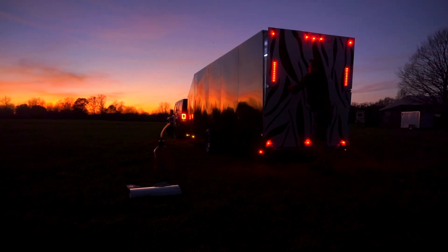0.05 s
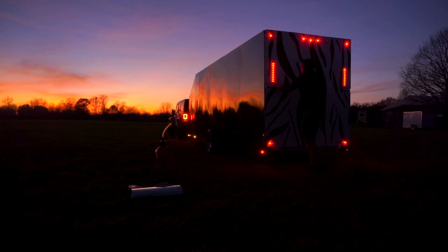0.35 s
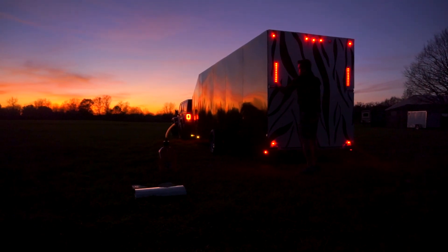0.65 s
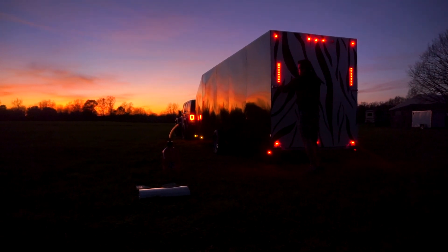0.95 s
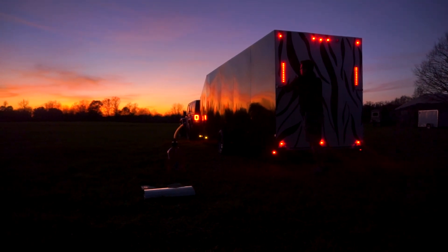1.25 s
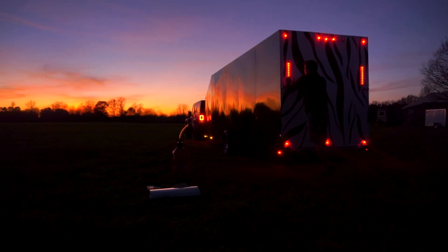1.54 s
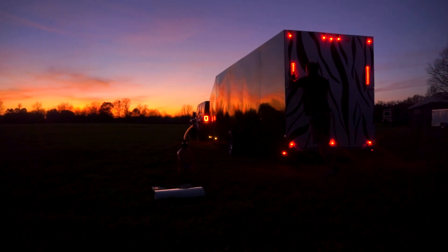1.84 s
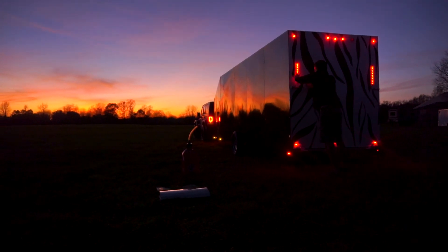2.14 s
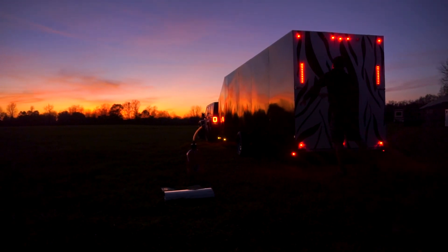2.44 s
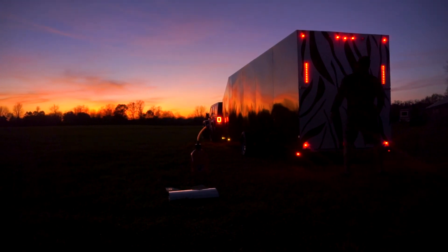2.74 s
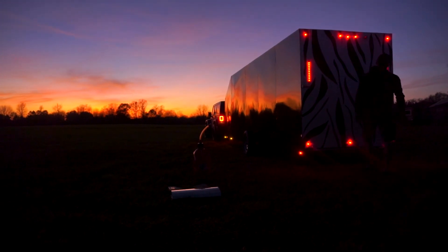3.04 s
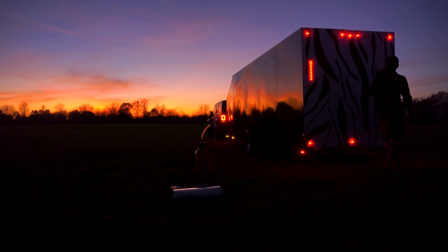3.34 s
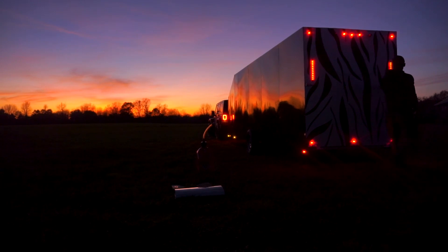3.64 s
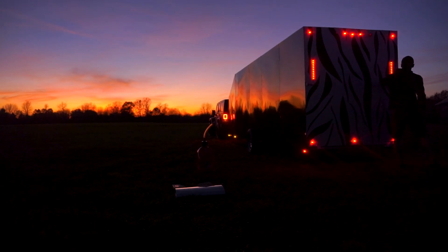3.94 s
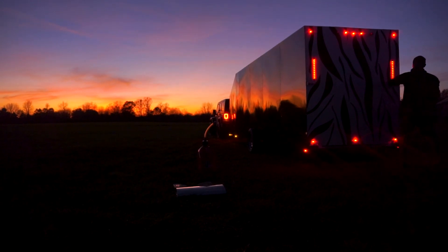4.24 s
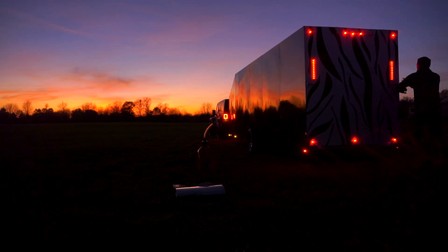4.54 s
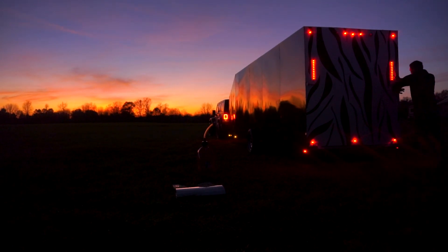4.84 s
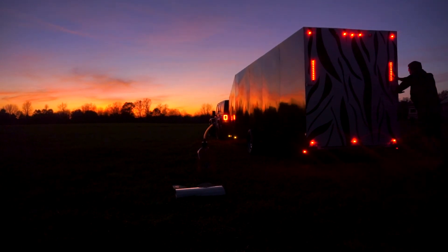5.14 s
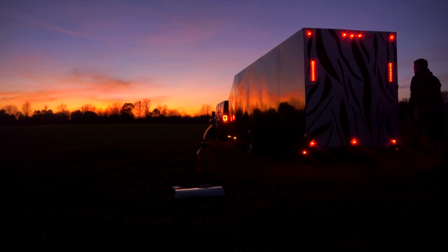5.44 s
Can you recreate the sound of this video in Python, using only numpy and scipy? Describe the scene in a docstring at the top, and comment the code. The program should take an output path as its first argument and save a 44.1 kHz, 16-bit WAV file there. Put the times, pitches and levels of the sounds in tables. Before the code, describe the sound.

Steel latch bars clack and an enclosed trailer's door bangs shut twice, booming and rattling briefly in a quiet open field.

```python
"""A steel latch bar scrapes and clacks, then the rear door of an enclosed trailer slams home: left edge
first, then right. Each slam booms in the box, clashes in the sheet metal and shakes loose hardware;
pins snap in and a hasp bounces to rest. Behind it, an open field at dusk: rustling clothes and grass,
a distant road, a soft low rumble of air and a faint hiss."""
import sys
import numpy as np
from scipy import signal
from scipy.fft import rfft, irfft, next_fast_len
from scipy.io import wavfile
from scipy.ndimage import map_coordinates

SR = 44100
rng = np.random.default_rng(int(sys.argv[2]) if len(sys.argv) > 2 else 0)


def store_pcm(level_fs):
    """Save levels as 16-bit WAV."""
    pcm = np.round(np.clip(level_fs, -1, 1) * 32767).astype(np.int16)
    wavfile.write(sys.argv[1], SR, np.atleast_2d(pcm).T)


N = 246280
SCENE_S = np.arange(N) / SR
RING_S = np.arange(3 * SR // 2) / SR  # time since a blow

# (time [s], edge [0 left, 1 right], boom [dB], sheet metal [dB], rattle [dB], hold [s])
SLAMS = [(1.986, 0, -25, -22.5, -32.5, 0.15), (4.979, 1, -27, -23.5, -31.5, 0.21)]
# (frequency [Hz], left-edge gain [dB], right-edge gain [dB], t60 [s])
BOX_MODES = [(75, -19, -17, 1.2), (120.3, -14.5, -21, 1.1), (161, -9.5, -12.5, 1.14), (190, -4, 1.5, 0.45),
             (214.4, 6, -13, 0.48), (244.8, -2.5, -0.5, 0.65), (264.8, -3.5, -2.5, 0.62),
             (299, -9, -12, 0.84), (460, -22, -5, 0.29), (653, -22.5, -22, 1.1), (742, -16, -10.5, 0.55),
             (821, -18, -19, 0.24), (1110, -10, -9, 0.2), (1970, -16, -13, 0.64), (2040, -10.5, -27, 0.47),
             (2180, -21, -34, 0.23), (2600, -22, -28, 0.31), (2770, -36, -16, 0.43)]
SHEET_SPECTRUM = [(21, -64), (35, -30), (93, -25.5), (151, -10.5), (210, -6), (301, -11), (478, -14.5),
                  (739, -13.5), (1720, -21.5), (2010, -18), (5590, -30), (6040, -34), (10900, -26),
                  (14800, -35), (16000, -55)]  # (frequency [Hz], relative density [dB])
SHEET_DECAY = [(100, 1.0), (250, 0.83), (700, 0.57), (2000, 0.62), (5000, 0.56), (12000, 0.39)]  # (frequency [Hz], t60 [s])
def slams(rattle_t60_s=0.49, rattle_rest_s=0.4):
    """The door hits its frame, shoves the air once and rings out."""
    out = np.zeros((2, N))
    for s, edge, boom_db, sheet_db, rattle_db, hold_s in SLAMS:
        age_s = np.hypot(RING_S, hold_s) - hold_s  # the slam stays level briefly before it dies away
        box = [(hz, right if edge else left, t60) for hz, left, right, t60 in BOX_MODES]
        boom = amp(boom_db) * modes(box, age_s, rise_cycles=12.2)
        sheet = amp(sheet_db) * plate(SHEET_SPECTRUM, SHEET_DECAY, age_s)
        settle = 1 / (1 + (RING_S / rattle_rest_s) ** 16)
        loose = amp(rattle_db - 60 * age_s / rattle_t60_s) * settle * rattle()
        thump = amp(boom_db - 13) * bell(RING_S - 0.014, 0.013) * np.sin(2 * np.pi * 80 * RING_S)
        add(out, s, boom + sheet + loose + thump)
    return out


# (time [s], touch lead [s], clack [dB], bar [dB], leaf [dB], shudder [s], drop re blow [dB])
LATCHES = [(1.349, 0.056, -17, -12.5, -32, 0.0084, -28.5), (1.987, .0445, -23, -27, -44, .01, -11),
           (4.092, .027, -20, -15.5, -24, 0.034, -7.5)]
def latches(rebound_s=0.011, rebound_db=-5.5, drop_s=0.18):
    """The bar touches its keeper, clacks home, rebounds and drops back; the door rings behind it."""
    out = np.zeros((2, N))
    for s, lead_s, clack_db, bar_db, leaf_db, shudder_s, drop_db in LATCHES:
        touch = clank(clack_db - 17.5, bar_db - 24, t60_s=0.15) + door_leaf(db=-35, shudder_s=0)
        add(out, s - lead_s, touch)
        add(out, s, door_leaf(leaf_db, shudder_s))
        for delay_s, db in [(0, 0), (rebound_s, rebound_db), (drop_s, drop_db)]:
            add(out, s + delay_s, clank(clack_db + db, bar_db + db, t60_s=0.065))
    return out


CLACK_SPECTRUM = [(59, -54), (100, -9.5), (736, 5.5), (991, 4.5), (1420, -4.5), (1910, 6), (2420, -10),
                  (3860, -10), (5190, -9), (5770, -15.5), (7290, -16), (7770, -23.5), (10200, -13),
                  (14700, -30), (16000, -24)]  # (frequency [Hz], relative density [dB])
BAR_MODES = [(982, -22.5, 0.48), (1134, -18.5, 0.19), (1548, -27, 0.27), (1858, -8, 0.025),
             (2022, -32, 0.19), (2124, -26, 0.44), (2196, -28, 0.37)]  # (frequency [Hz], gain [dB], t60 [s])
def clank(clack_db, bar_db, t60_s):
    """Steel on steel: a dry clack and the ring of the bar."""
    clack = amp(clack_db - 60 * RING_S / t60_s) * noise(CLACK_SPECTRUM, len(RING_S))
    return clack + amp(bar_db) * modes(BAR_MODES, RING_S, rise_cycles=0.36)


LEAF_SPECTRUM = [(35, -53), (60, -27.5), (217, -6.5), (308, -7), (346, -9.5), (398, -9), (540, -4),
                 (579, -4), (946, -6), (1310, -13), (7750, -31), (10800, -20.5), (16000, -33)]  # (frequency [Hz], relative density [dB])
LEAF_DECAY = [(150, 1), (700, 0.7), (2000, 0.9), (10000, 0.32)]  # (frequency [Hz], t60 [s])
LEAF_MODES = [(341.6, -6.5, 0.61), (522, -12.5, 0.43), (660, -10, 0.72), (814, -37, 0.42), (996, -25, 0.24),
              (1200, -20, 0.6)]  # (frequency [Hz], gain [dB], t60 [s])
def door_leaf(db, shudder_s, spread_s=0.026):
    """A blow spreads over the door leaf, which shudders and rings out."""
    age_s = np.hypot(RING_S, shudder_s) - shudder_s
    ring = plate(LEAF_SPECTRUM, LEAF_DECAY, age_s) + modes(LEAF_MODES, age_s, rise_cycles=3.2)
    return amp(db) * ring * (1 - np.exp(-RING_S / spread_s))


HARDWARE_SPECTRUM = [(800, -11), (2000, 1.5), (3000, 0), (4500, -5), (6200, -3), (8500, -1.5), (11000, -1),
                     (13000, -2), (15500, -7.5)]  # (frequency [Hz], relative density [dB])
def rattle(hits_per_s=280, spread_db=10, t60_s=0.031):
    """Dense random contacts of loose hardware, rms 1."""
    size = len(RING_S)
    hits = (rng.random(size) < hits_per_s / SR) * amp(spread_db * rng.random(size))
    power = np.abs(signal.fftconvolve(hits ** 2, amp(-60 * RING_S / t60_s) ** 2)[:size])
    return unit(noise(HARDWARE_SPECTRUM, size, ripple_db=4.5) * np.sqrt(power))


def tick(db, pitch_hz, t60_s=0.03, focus_db=10.5, half_width_hz=1200):
    """A small steel part rings briefly around its pitch."""
    t = np.arange(SR // 10) / SR
    steel = noise(HARDWARE_SPECTRUM, len(t), ripple_db=4)
    burst = filtered(steel, lambda hz: amp(focus_db / (1 + ((hz - pitch_hz) / half_width_hz) ** 2)))
    return amp(db - 60 * t / t60_s) * unit(burst)


PINS = [(1.2957, -29, 5600), (1.9435, -14, 5100), (1.986, -9.5, 5240), (2.015, -3.5, 5460),
        (4.095, -6.5, 10200), (4.388, -27, 3820), (4.979, -11, 11400)]  # (time [s], level re gain_db [dB], pitch [Hz])
def pins(gain_db):
    """Each pin snaps into place with one tick."""
    out = np.zeros((2, N))
    for s, db, pitch_hz in PINS:
        add(out, s, tick(db + gain_db, pitch_hz))
    return out


# (time [s], level re gain_db [dB], first flight [s], next flight over last [ratio], rest after [s])
HASPS = [(2.0859, -10, .073, .68, .19), (4.9991, -5, .1364, .8, .28)]
def hasps(gain_db, high_hz=10840, low_hz=3500, fade_db_per_s=50):
    """A hasp with two resonances bounces after each slam in ever shorter, weaker hops."""
    out = np.zeros((2, N))
    for s, db, flight_s, shrink, rest_s in HASPS:
        hops_s = np.cumsum([0] + [flight_s * shrink ** k for k in range(6)])
        for hop_s in hops_s[hops_s < rest_s]:
            hop_db = db + gain_db - fade_db_per_s * hop_s
            add(out, s + hop_s, tick(hop_db, high_hz) + tick(hop_db - 4.5, low_hz))
    return out


SCRAPES = [(0.2, -55.5, 0.03), (1.037, -56.5, 0.13), (1.14, -51.5, 0.045), (1.24, -52, 0.04),
           (1.346, -39.5, 0.034), (1.957, -46.5, 0.027), (1.983, -26.5, 0.014), (2.76, -59, 0.14),
           (4.082, -28.5, 0.01)]  # (time [s], level [dB], half length [s])
GRIT_SPECTRUM = [(1000, -2), (3000, 3), (5500, -1.5), (8000, -3), (16000, -24)]  # (frequency [Hz], relative density [dB])
def scrapes():
    """Steel sticks and slips: the bar in its guides, the door on its frame."""
    strokes = sum(amp(db) * bell(SCENE_S - s, half_s) for s, db, half_s in SCRAPES)
    friction = noise(LEAF_SPECTRUM, N) + amp(-2.5) * noise(GRIT_SPECTRUM, N)
    return strokes * unit(friction * amp(2.7 * wobble(180)))


GROANS = [(0.319, 0.023, 230, 0, -56.5), (0.377, 0.099, 358, 353, -67), (4.965, 0.02, 362, 700, -46)]  # (time [s], half length [s], pitch [Hz], glide [Hz/s], level [dB])
def groans():
    """The strained door sings brief low notes, steady or rising."""
    out = np.zeros(N)
    for s, half_s, hz, glide_hz_per_s, db in GROANS:
        t = SCENE_S - s
        out += amp(db) * bell(t, half_s) * np.sin(2 * np.pi * (hz + glide_hz_per_s * t / 2) * t)
    return out


SWISHES = [(.2, -56, 0.042), (.41, -56.5, 0.093), (.61, -53.5, 0.04), (1.08, -52.5, 0.077),
           (1.13, -43.5, 0.036), (2.76, -50, 0.056), (2.97, -56, 0.065), (3.42, -51, 0.13),
           (3.71, -55, 0.035), (4.4, -51.5, 0.32), (4.72, -45, 0.12), (5.48, -55, 0.099)]  # (time [s], level [dB], half length [s])
RUSTLE_SPECTRUM = [(1000, -21), (2500, -16), (6000, -15.5), (8500, -7), (10500, 1.5), (12500, 4),
                   (16000, -2)]  # (frequency [Hz], relative density [dB])
CLICKS = [(1.562, -36), (2.538, -36), (4.7145, -19)]  # (time [s], level re click_db [dB])
CLICK_SPECTRUM = [(3000, -36), (7000, -23), (9500, 1), (12000, 9), (16000, -4)]  # (frequency [Hz], relative density [dB])
def rustle(right_db=2.0, click_db=-5.5):
    """Clothes and grass, off to the right: a grainy high hiss with a few dry clicks."""
    grain = amp(0.82 * wobble(30) + 2.25 * wobble(820))
    out = swells(SWISHES, floor_db=-67) * grain * noise(RUSTLE_SPECTRUM, N)
    t = np.arange(SR // 20) / SR
    click_decay = amp(-60 * t / 0.0029) + amp(-13 - 60 * t / 0.038)
    for s, db in CLICKS:
        add(out, s, amp(db + click_db) * click_decay * noise(CLICK_SPECTRUM, len(t)))
    return stereo(out, FAR_COHERENCE) * amp([[-right_db / 2], [right_db / 2]])


ROAD_LEVEL = [(0, -59.5), (1.8, -57), (4.8, -51.5), (5.58, -54.5)]  # (time [s], level [dB])
ROAD_SPECTRUM = [(60, -35), (200, -6), (350, -21.5), (540, -10.5), (780, 1.5), (1150, 2.5), (1600, -0.5),
                 (2100, -7), (3200, -15), (5500, -34), (16000, -50)]  # (frequency [Hz], relative density [dB])
def road():
    """Far traffic draws nearer, then recedes."""
    level_db = np.interp(SCENE_S, *np.transpose(ROAD_LEVEL))
    return stereo(amp(level_db) * noise(ROAD_SPECTRUM, N), FAR_COHERENCE)


AIR_SWELLS = [(.42, -70, .16), (1.14, -45.5, 0.15), (2.5, -47, 0.34), (2.78, -44.5, 0.11),
              (3.1, -54.5, 0.32), (3.73, -52.5, 0.048), (4.41, -45.5, 0.053), (5.45, -46, 0.23)]  # (time [s], level [dB], half length [s])
AIR_SPECTRUM = [(15, -52), (25, -28), (64, -5), (139, 0.5), (224, -2), (284, -9), (384, -27.5), (500, -20),
                (650, -80), (1100, -120)]  # (frequency [Hz], relative density [dB])
def air(calm_db=-73, rise_db_per_s=3):
    """Stirring air rumbles in soft swells over a slowly rising floor."""
    gain = swells(AIR_SWELLS, calm_db + rise_db_per_s * SCENE_S) * amp(1.3 * wobble(13))
    return stereo(gain * noise(AIR_SPECTRUM, N), NEAR_COHERENCE)


HISS_SPECTRUM = [(100, -14), (500, 15.5), (2000, 1), (5000, 4.5), (9000, 4.5), (16000, -8.5)]  # (frequency [Hz], relative density [dB])
WHINE_SPECTRUM = [(12000, -60), (12750, -14), (12950, 0), (13150, -14), (13900, -60)]  # (frequency [Hz], relative density [dB])
def hiss():
    """A steady hiss with a faint whine near 13 kHz."""
    steady = amp(-65) * noise(HISS_SPECTRUM, N) + amp(-70) * noise(WHINE_SPECTRUM, N)
    return stereo(steady, FAR_COHERENCE)


LEFT_SHADE = [(250, 0), (500, 0.5), (1000, -5), (1900, -12), (3400, -7), (5200, 0.5), (8000, -2),
              (15000, -3.5)]  # (frequency [Hz], left re right [dB])
NEAR_COHERENCE = [(200, 1), (900, 0.97), (1800, 0.84), (5000, 0.55), (14000, 0.46)]  # (frequency [Hz], left-right coherence [0..1])
FAR_COHERENCE = [(130, .98), (300, 0.0077), (650, 0.43), (1400, 0), (15000, 0)]  # (frequency [Hz], left-right coherence [0..1])
def stereo(pair, coherence, lag_ms=0):
    """Two signals become left and right, alike in the bass; the left is shaded and lags by lag_ms."""
    def mixing(hz):
        likeness = np.clip(along(coherence, hz), -.9, .999)
        turn = np.arccos(likeness) / 2
        shade = amp(along(LEFT_SHADE, hz))
        phase = 2 * np.pi * hz * lag_ms / 1000
        mid_gain = np.sqrt(1 + shade ** 2 + 2 * shade * likeness * np.cos(phase)) / 2
        left = shade * np.exp(-1j * phase)
        common, apart = np.cos(turn), np.sin(turn)
        return np.array([[left * common, left * apart], [common, -apart]]) / mid_gain
    return filtered(pair, mixing).sum(axis=1)


def modes(rows, age_s, rise_cycles, waver_per_s=22.3, waver_rad=0.51, waver_db=3):
    """Strong resonances build up and decay; loose joints make their phase and level waver."""
    out = np.zeros((2, len(RING_S)))
    for hz, db, t60_s in rows:
        knots = rng.standard_normal((2, 128))
        drift, flutter = [np.interp(RING_S * waver_per_s, np.arange(128), row) for row in knots]
        phase = rng.uniform(0, 2 * np.pi, (2, 1)) + waver_rad * drift
        rise = 1 - np.exp(-RING_S * hz / rise_cycles)
        decay = amp(db + waver_db * flutter - 60 * age_s / t60_s)
        out += rise * decay * np.sin(2 * np.pi * hz * RING_S + phase)
    return out


def plate(spectrum, decay, age_s):
    """Countless close modes of a panel; each band dies at its own rate."""
    ringing = noise(spectrum, len(RING_S), ripple_db=2.8)
    hz, t, bands = signal.stft(ringing, SR, nperseg=256)
    fade = amp(-60 * np.interp(t, RING_S, age_s) / along(decay, hz)[:, None])
    return signal.istft(bands * fade, SR, nperseg=256)[1][:, :len(RING_S)]


def noise(spectrum, size, ripple_db=0):
    """Two unrelated coloured noises, rms 1, sharing random resonant peaks and dips."""
    grid_hz = np.arange(0, SR, 70)
    peaks_db = ripple_db * rng.standard_normal(len(grid_hz))
    def colour(hz):
        return amp(along(spectrum, hz) + np.interp(hz, grid_hz, peaks_db) * hz / (hz + 600))
    return unit(filtered(rng.standard_normal((2, size)), colour))


def swells(rows, floor_db):
    """Gain of smooth swells over a floor; powers add."""
    power = sum(amp(db) ** 2 / np.cosh(np.minimum(np.abs(SCENE_S - s) / half_s, 20)) ** 3
                for s, db, half_s in rows)
    return np.sqrt(amp(floor_db) ** 2 + power)


def bell(t, half_s):
    """Gaussian envelope around t = 0."""
    return np.exp(-(t / half_s) ** 2)


def wobble(knots_per_s):
    """Smooth random curve."""
    knots = rng.standard_normal(int(N * knots_per_s / SR) + 4)
    return map_coordinates(knots, [SCENE_S * knots_per_s])


def filtered(x, response):
    """x through a frequency response."""
    size = x.shape[-1]
    padded = next_fast_len(size + 8192)
    return irfft(rfft(x, padded) * response(np.fft.rfftfreq(padded, 1 / SR)), padded)[..., :size]


def along(points, hz):
    """Breakpoints read on a log frequency axis."""
    knots_hz, values = np.transpose(points)
    return np.interp(np.log(hz + 1), np.log(knots_hz + 1), values)


def add(track, s, sound):
    """Mix a sound in at time s."""
    start = round(s * SR)
    track[..., start:start + sound.shape[-1]] += sound[..., :N - start]


def amp(db):
    """Decibels to gain."""
    return 10 ** (np.asarray(db) / 20)


def unit(x):
    """Scale to rms 1."""
    return x / np.sqrt(np.mean(x ** 2) + 1e-20)


def scene():
    """The trailer, a little to the right, in the open field."""
    trailer = slams() + latches() + scrapes() + pins(gain_db=-16) + hasps(gain_db=-16)
    return stereo(trailer, NEAR_COHERENCE, lag_ms=0.049) + groans() + rustle() + road() + air() + hiss()


def record(dry, cutoff_hz=16000):
    """Steep low-pass."""
    return filtered(dry, lambda hz: 1 / (1 + (hz / cutoff_hz) ** 200))


dry = scene()
out = record(dry)
store_pcm(out)
```